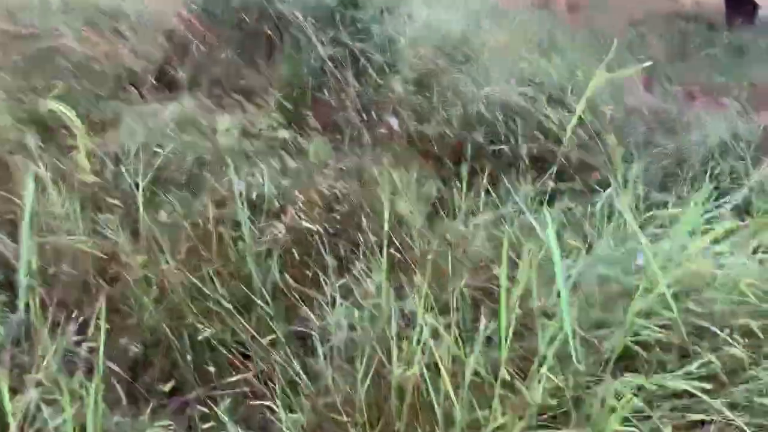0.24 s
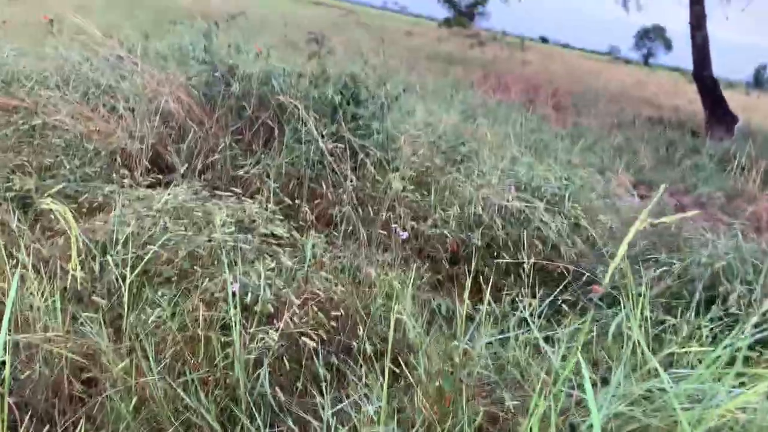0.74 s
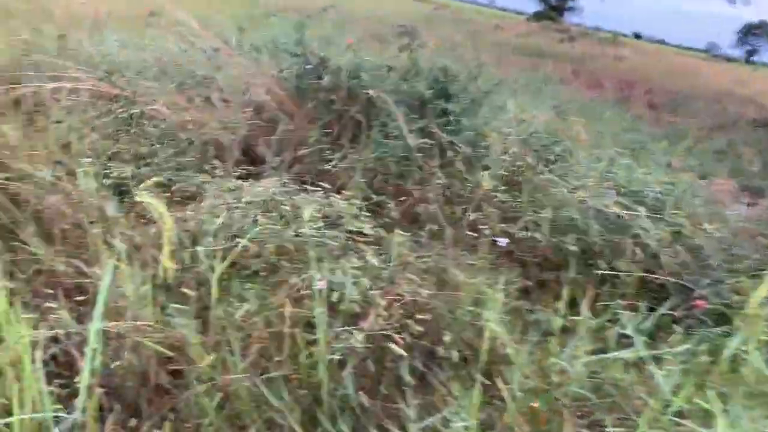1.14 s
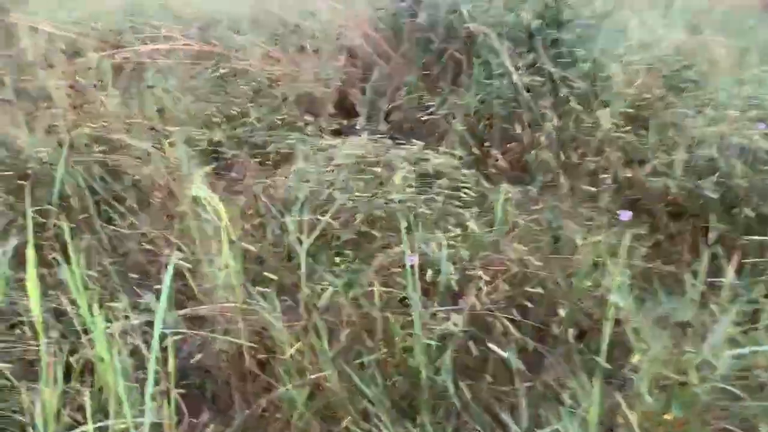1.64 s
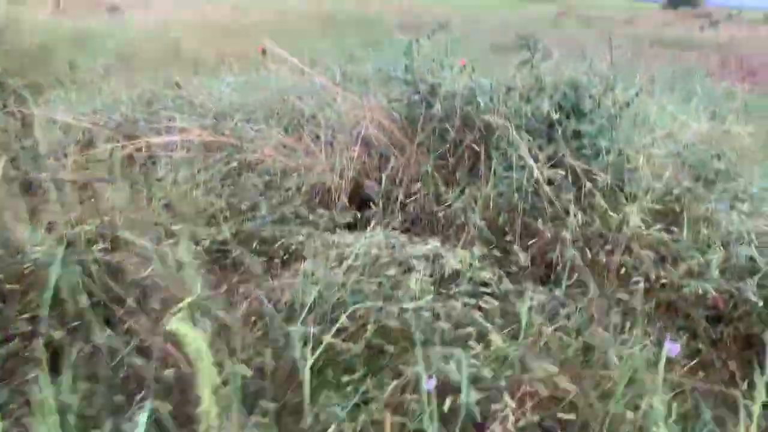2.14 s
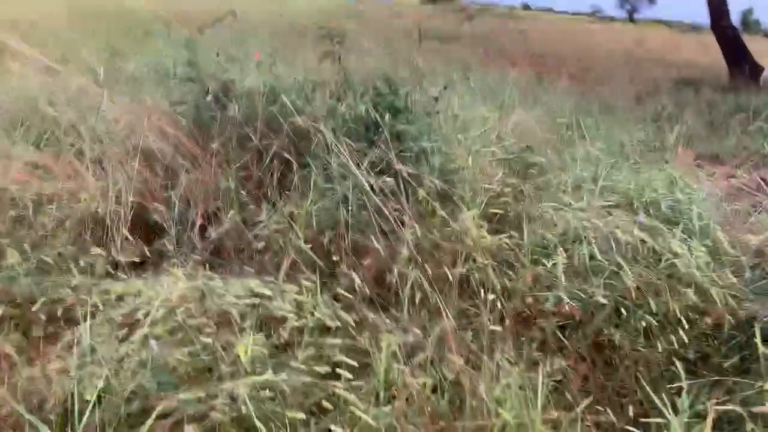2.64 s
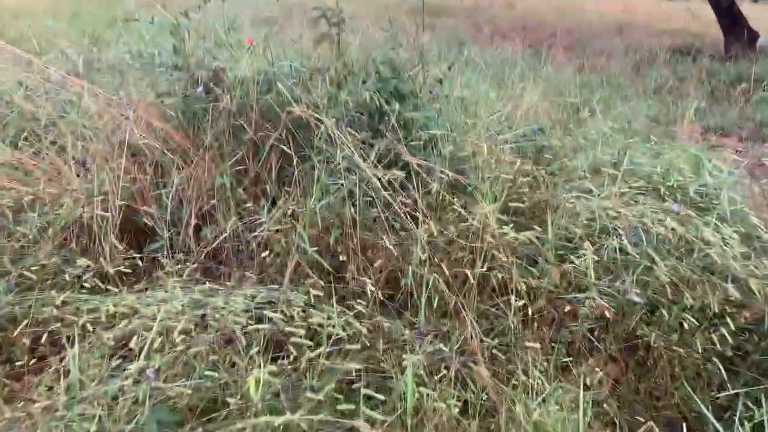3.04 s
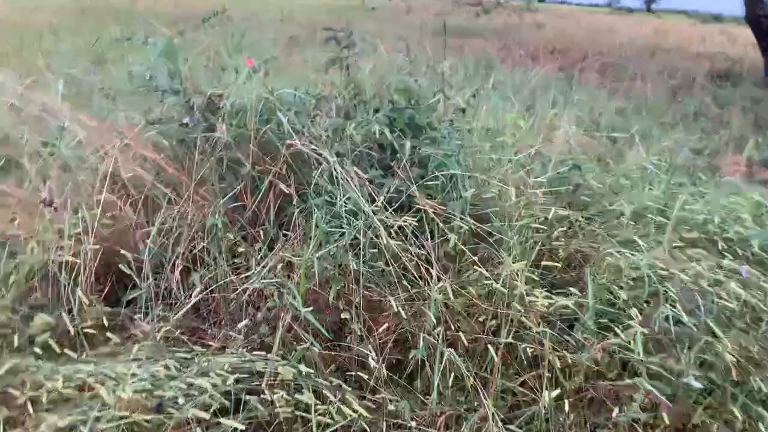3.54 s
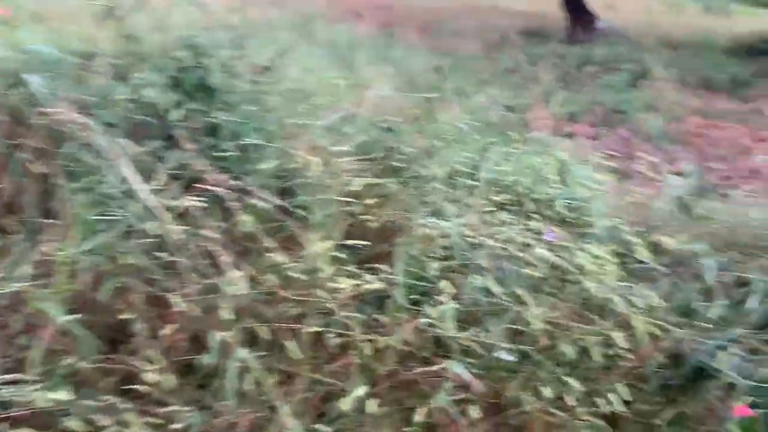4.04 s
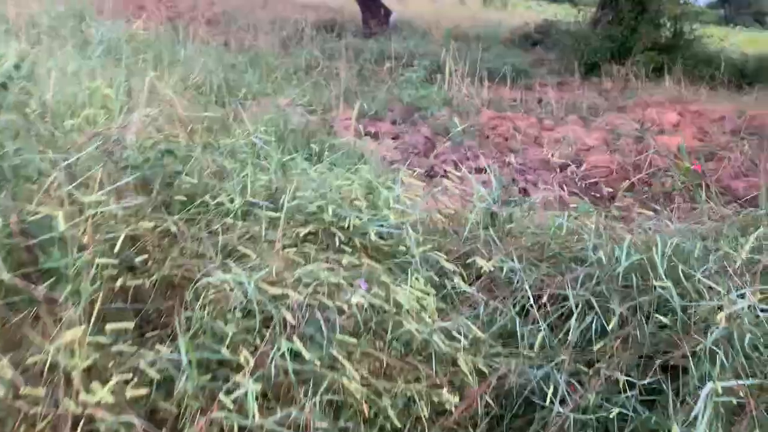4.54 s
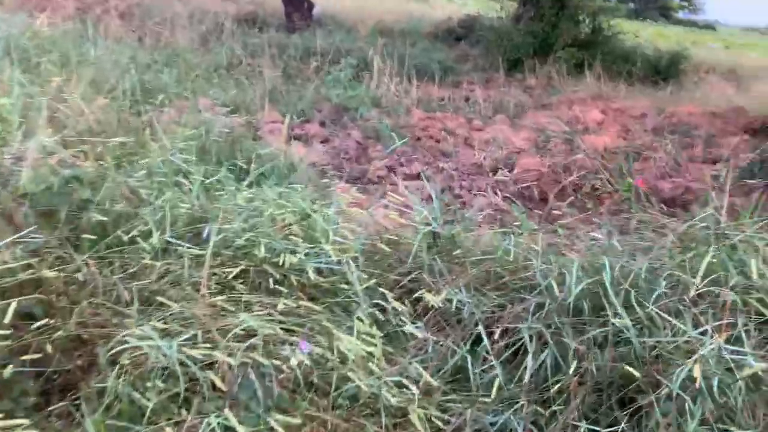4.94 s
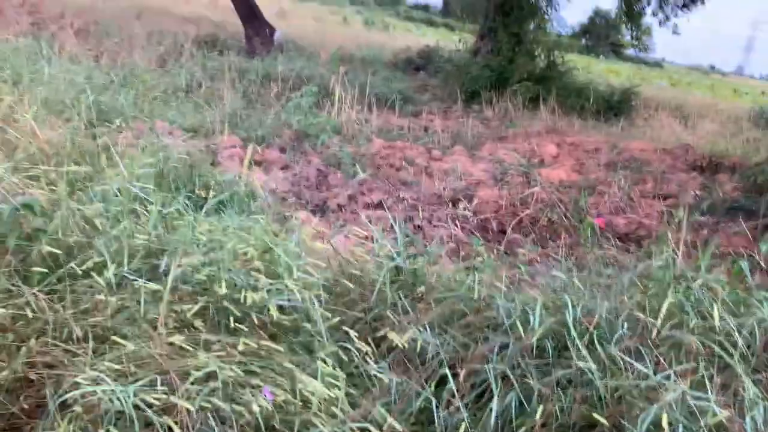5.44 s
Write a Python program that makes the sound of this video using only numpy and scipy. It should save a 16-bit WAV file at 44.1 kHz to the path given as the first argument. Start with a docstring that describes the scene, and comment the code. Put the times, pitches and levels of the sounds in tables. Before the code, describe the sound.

Someone wades slowly through tall dry grass, stems rustling and snapping, with small handling knocks, high insects and light wind on the microphone.

```python
"""Dry tall grass rustles as someone wades slowly through it with a hand-held camera.
Stick-slip friction sounds the stalks, blades and seed heads; stems snap by brittle fracture, and two
tufts slap the camera close to its two microphone ports. Slipping fingers excite the modes of the case,
which knocks and creaks. Insects stridulate at a high pitch, one of them near on the right, and the
turbulence of a light wind rumbles at the ports over the far hiss of the field."""
import sys
import numpy as np
from scipy import signal
from scipy.fft import rfft, irfft
from scipy.io import wavfile
from scipy.ndimage import uniform_filter1d

SR = 44100
rng = np.random.default_rng(int(sys.argv[2]) if len(sys.argv) > 2 else 0)


def inscribe(sig):
    """Save sig as 16-bit PCM at rate SR to the path in sys.argv[1].

    A 1-D sig is mono; a 2-D sig holds one channel per row.
    Samples are clipped to [-1, 1] before scaling.
    """
    pcm = np.round(np.clip(np.atleast_2d(sig).T, -1, 1) * 32767)
    wavfile.write(sys.argv[1], SR, pcm.astype(np.int16))


N = 250488
TIME = np.arange(N) / SR

# Pushes of a leg through the grass. Each row: time of reaching full speed, rise, hold and release in
# seconds, then the levels of bent stalks, sliding blades and seed heads in dB.
LEG_PUSHES = [(0.25, 1, 0.022, 0.59, -72.5, -81, -75), (0.91, 0.22, 0.35, 0.18, -65.5, -64.5, -59.5),
              (0.997, 0.1, 0.031, 0.21, -61, -57, -64), (1.238, 0.3, 0.014, 1, -83, -80, -76),
              (1.503, 0.6, 0.11, 0.086, -61.5, -77, -64.5), (2.053, 0.91, 0.035, 0.15, -62, -75, -73.5),
              (2.117, 0.022, 0.043, 0.3, -85, -61.5, -59.5), (2.438, 0.19, 0.051, 0.15, -52.5, -64, -69.5),
              (2.524, 1, 0.26, 0.79, -69.5, -80, -71), (2.804, 0.065, 0.062, 0.084, -79, -66.5, -68),
              (3.065, 0.39, 0.26, 0.16, -60, -66.5, -63), (3.457, 0.13, 0.11, 0.18, -66.5, -77, -70.5),
              (4.13, 0.46, 0.063, 0.5, -59.5, -67.5, -66), (4.595, 0.22, 0.023, 0.21, -70.5, -77, -77),
              (4.96, 0.3, 0.017, 0.46, -73, -78.5, -89)]
# Dry stems breaking. Each row: start in seconds, base level in dB, offset of the splinters in dB,
# pitch of the stem in Hz, tearing time in seconds.
STEM_SNAPS = [(0.2472, -43.5, -32, 2000, 0.012), (1.349, -35.5, -10.5, 1440, 0.0027),
              (1.4938, -41.5, -7, 1700, 0.012), (1.5014, -37.5, -18, 1900, 0.014),
              (2.437, -24.5, -36, 1300, 0.0046), (2.7915, -27, -8, 1200, 0.0045),
              (2.7965, -28, 1, 1380, .009), (2.8106, -31, 0, 1400, 0.0038), (2.82, -39, -4, 1300, .007),
              (3.1094, -42, -22, 1590, 0.011), (3.2486, -32, -18, 1800, .011),
              (3.3002, -29.5, -26, 1600, 0.012), (3.3108, -34, -18, 1300, 0.01),
              (3.3654, -36, -22, 1550, .011), (3.47, -40.5, -24, 1480, 0.0086),
              (3.476, -44.5, -20, 1500, 0.014), (3.5639, -48.5, 6, 1500, 0.0088),
              (3.999, -42.5, -18, 1630, 0.0052), (4.01, -48, -24, 2320, 0.016),
              (4.3012, -41, -14, 1900, 0.016), (4.3227, -37, -22, 1750, 0.008),
              (4.6295, -43.5, -20, 1500, .018), (4.6814, -48, -28, 1850, .012),
              (5.0894, -52, -19, 1680, 0.0051)]
# Seed heads flicking past. Each row: start in seconds, level in dB.
SEED_FLICKS = [(0.529, -65.5), (0.6338, -47), (0.644, -72), (1.231, -51), (4.607, -61.5)]
# Tufts striking the case. Each row: start in seconds; crunch, blade, seed and scrape levels in dB; thud
# delay in seconds, level in dB and pitch in Hz; drag level in dB, centre in Hz and time in seconds.
TUFT_SLAPS = [(1.492, -31.5, -82, -48, -40, 0.0133, -22.5, 90, -45, 870, 0.13),
              (2.1208, -30.5, -45, -44.5, -49, 0.011, -20.5, 100, -44.5, 975, 0.1)]
# Likeness of the rustle at the two ports. Each row: frequency in Hz, correlation coefficient.
GRASS_CORRELATION = [(200, 1), (570, 0.72), (1200, 0.9), (2200, 0.73), (4000, 0.97), (5500, 0.12),
                     (11000, 0.063)]

# Spectra of the plants. Each row: frequency in Hz, relative spectral density in dB.
STALKS = [(150, 2), (350, 10), (580, 11.5), (850, 7.5), (1150, 3.5), (1550, 7), (2100, 1.5), (2600, 2),
          (3200, -12), (5000, -8), (11000, -42)]
BLADES = [(1100, -31), (1600, 5.5), (2100, -2.5), (2600, 4), (3600, 9.5), (4200, 9.5), (5000, 1.5),
          (6500, -17), (9000, -11), (12000, -17)]
SEEDS = [(4000, -44), (5800, -1), (7100, -5), (7800, 0.5), (8700, 4.5), (11200, 1.5), (12000, -90)]
SNAP = [(300, -11), (750, 14), (1400, 23.5), (2300, 6.5), (3400, 8.5), (5200, -15), (9000, 0)]  # a stem pitched at SNAP_HZ
SPLINTER = [(2500, -8), (4500, 6.5), (7000, 13), (9500, 12), (11000, 4), (12500, -68)]
CRUNCH = [(60, 18.5), (250, 14), (520, 15), (800, -4), (1250, -9), (1900, -6), (2600, -16), (3500, -56),
          (8000, -43)]
BLADE_SLAP = [(1500, -36), (2600, -4), (3700, 10.5), (5000, 0.5), (6000, 2), (7500, -14)]
SEED_SLAP = [(4000, -2), (6000, 4), (7500, 3), (8500, 26), (9500, 10), (11000, 5), (12000, -44)]
SCRAPE = [(1300, -26), (2000, 13), (2600, 4), (3300, -7), (3900, 2), (4400, -8), (5500, -14), (7000, -30)]  # blade edges crossing the ports
DRAG = [(250, -27), (500, 7.5), (750, -5), (1000, 4.5), (1180, -1), (1450, -31), (2500, -31)]  # a tuft dragging along the case, centred on DRAG_HZ

# Shifts of the grip. Each row: start in seconds, levels of the wall, low and high modes in dB.
GRIP_KNOCKS = [(0.019, -39, -37, -44), (0.21, -36.5, -43, -53), (0.594, -36.5, -41.5, -53),
               (1.046, -27, -40, -43), (1.491, -31.5, -35.5, -47), (1.518, -39, -40, -50),
               (1.529, -37, -37, -59), (1.604, -40.5, -39, -38.5), (1.8, -30, -43.5, -46.5),
               (1.992, -41.5, -52, -50.5), (2.124, -34, -37, -54), (2.49, -54, -37, -62),
               (2.669, -44.5, -45.5, -56), (2.725, -46, -41, -60), (3.149, -40.5, -62, -52),
               (3.383, -47.5, -49, -49.5), (3.472, -46, -34.5, -39.5), (3.542, -44.5, -47, -44),
               (3.803, -33.5, -49, -55), (3.905, -38, -51, -51.5), (4.093, -31, -41, -44),
               (4.453, -34.5, -37.5, -42.5), (4.459, -46, -34, -39)]
# Slides of the grip. Each row: start and length in seconds, level in dB, low modes against wall modes
# in dB, lowest mode in Hz (higher in a tight grip).
GRIP_CREAKS = [(0.211, 0.056, -38.5, 1.5, 269.5), (1.09, .14, -63.5, -17, 251),
               (3.154, 0.055, -47.5, 3, 345), (3.405, 0.085, -53, 0, 252), (3.479, 0.022, -48.5, 3, 260),
               (3.811, 0.074, -49, -3.5, 249), (4.12, 0.097, -58, -10, 250)]
# Modes of the case. Each row: mean frequency in Hz, relative level in dB, time to fall 60 dB in seconds.
LOW_MODES = [(249.8, 2.5, 0.06), (290, -0.5, 0.059), (335.3, -4, 0.044), (400.5, 1.5, 0.018)]  # the case as a whole
WALL_MODES = [(513.2, 1.5, 0.075), (620, -6, 0.094), (801, -10.5, 0.021), (1470, -28, 0.13),
              (1563, -42, 0.031)]
HIGH_MODES = [(826, -2.5, 0.068), (897, 3, 0.048), (1022, -7, 0.023)]  # excited by a sharp press

# Swell of the near insect and the chorus. Each row: time in seconds, gain in dB.
INSECT_SWELL = [(0, 1), (0.2, 3.5), (0.37, 8), (0.58, 1.5), (1.2, 5.5), (1.8, 3.5), (2.9, 5.5), (3.7, 4),
                (4.05, 2.5), (5.6, 0)]
# Swells of low rumble at the ports; the row at 1.525 s deepens the low boom of the first slap. Each row: time
# of the peak and half width in seconds, rise above the breeze in dB.
GUSTS = [(0.331, 0.01, 8), (0.467, 0.018, 9), (1.525, 0.037, 2.5), (1.8, 0.042, 6), (2.92, 0.16, 1.5),
         (5.02, 0.02, 3.5)]
# Spectra of the background. Each row: frequency in Hz, relative spectral density in dB.
CHORUS = [(5400, -36), (6100, -5.5), (6600, -2), (6950, 8), (7350, 6), (7600, -6.5), (7800, -19),
          (8600, -41), (11000, -34)]  # far insects
SHRILL = [(7500, -40.5), (8100, 19), (8500, 13.5), (9200, 11.5), (9900, 0), (11200, -22), (12000, -42)]  # a bright hiss at 8-9.5 kHz, stronger on the right
WIND_RUMBLE = [(20, -18.5), (35, -12.5), (52, 2), (80, 0.5), (120, -4), (170, -12), (240, -13), (320, -22),
               (450, -55), (800, -112)]
FIELD_HISS = [(100, -49), (350, 5), (600, 7), (850, -4.5), (1200, -11), (2000, -15.5), (2900, -21.5),
              (3500, -22.5), (4300, -29), (5200, -29), (11300, -22), (12200, -65)]

SNAP_HZ, DRAG_HZ = 1400, 1000
PORT_DELAY_S = 0.000476  # travel time of sound from one port to the other


def grass_rustle():
    """Stick-slip friction: stalks, blades and seed heads catch and let go in clumps of fine clicks."""
    stalk_rub = rubbing(part=0, rest_db=-117)
    blade_rub = rubbing(part=1, rest_db=-102)
    seed_rub = rubbing(part=2, rest_db=-89, linger=1.72)  # seed heads sway on
    clumps = amp(1.5 * drift(rate_hz=45))
    stalks = colour(grains(N, per_s=900, spread_db=-2.5, smooth=0.7), STALKS, GRASS_CORRELATION)
    blades = colour(grains(N, per_s=2300, spread_db=2, smooth=1), BLADES, GRASS_CORRELATION)
    seeds = colour(grains(N, per_s=5900, spread_db=6.5, smooth=1), SEEDS, GRASS_CORRELATION)
    stalks = patchy(stalks, depth_db=2.8) * stalk_rub * clumps
    blades = patchy(blades, depth_db=2.1) * blade_rub * clumps
    seeds = patchy(seeds, depth_db=1.4) * seed_rub * amp(0.5 * drift(rate_hz=12))
    ticks = blade_crackle(per_s=220, pitches=16) * np.sqrt(stalk_rub * blade_rub) * amp(-7.5)
    return stalks + blades + ticks + seeds * pan(left_db=-2)


def rubbing(part, rest_db, linger=1):
    """Incoherent sources add in power: the leg pushes sum to the envelope of one part of the plants."""
    power = amp(rest_db) ** 2
    range_db = 30  # gained over a rise, lost over a release
    for start, rise, hold, release, *levels_db in LEG_PUSHES:
        before = np.maximum(start - TIME, 0) / rise
        after = np.maximum(TIME - start - hold, 0) / (release * linger)
        power = power + amp(levels_db[part] - range_db * (before + after)) ** 2
    return np.sqrt(power)


def grains(size, per_s, spread_db, smooth):
    """Shot noise: fibres click at random with uneven strength, over a share of smooth friction noise."""
    strength = amp(spread_db * np.minimum(rng.exponential(1, (2, size)), 4))
    clicks = strength * rng.choice([-1, 1], (2, size)) * (rng.random((2, size)) < per_s / SR)
    return unit_rms(clicks) + smooth * rng.standard_normal((2, size))


def patchy(pair, depth_db):
    """Spectral modulation: each stem has its own pitch, so the colour shifts in small patches."""
    spectrogram = signal.stft(pair, nperseg=512)[2]
    patches = uniform_filter1d(rng.standard_normal(spectrogram.shape[1:]), size=5, axis=0)
    patches = unit_rms(uniform_filter1d(patches, size=7, axis=1))
    shifted = signal.istft(spectrogram * amp(depth_db * patches), nperseg=512)[1]
    return unit_rms(shifted[:, :pair.shape[1]])


def blade_crackle(per_s, pitches):
    """Damped free vibration: single blades let go at random, each ticking at its own pitch and side."""
    out, t = np.zeros((2, N)), np.arange(512) / SR
    tick_cycles = 2.5
    for hz in np.geomspace(1290, 4560, pitches):  # thickest blade to thinnest
        released = rng.random(N) < per_s / pitches / SR
        side = rng.standard_normal()
        strength = amp(2 * np.minimum(rng.exponential(1, N), 2))
        age = t * hz / tick_cycles
        tick = np.sin(2 * np.pi * hz * t) * age * np.exp(-np.pi * age)
        out += signal.oaconvolve(released * strength, tick)[:N] * pan(left_db=2 * side)
    return unit_rms(out)


def stem_snaps():
    """Brittle fracture: a stem clicks at its own pitch, then its fibres tear, fray and splinter."""
    out, t = np.zeros((2, N)), np.arange(2048) / SR
    lead_in = 128  # samples of room for the click's onset
    click_db, tear_db, fray_db, splinter_db = -4, -13.5, -19, -10
    impulse = np.ones((2, 1)) * (np.arange(len(t)) == lead_in)
    for start, db, treble_db, stem_hz, tearing_s in STEM_SNAPS:
        stem = [(hz * stem_hz / SNAP_HZ, level) for hz, level in SNAP]
        click = colour(impulse, stem)
        click /= abs(click).max()
        tearing = np.exp(-(np.pi * t / tearing_s) ** 2) + amp(fray_db) * decay(t, t60=0.1)
        fibres = np.roll(tearing * rng.standard_normal((2, len(t))), lead_in, axis=1)
        tear = colour(fibres, stem, correlation=0.52) * np.sqrt(np.mean(tearing ** 2))
        add(out, start - lead_in / SR, amp(db + click_db) * click + amp(db + tear_db) * tear)
        splinters = noise(len(t), SPLINTER, correlation=0.19)
        fall = decay(t, t60=0.0059) + amp(-18.5) * decay(t, t60=0.14)
        add(out, start, amp(db + treble_db + splinter_db) * fall * splinters)
    return out


def seed_flicks():
    """Light impact: a seed head flicking past gives a short burst of treble noise."""
    out, t = np.zeros((2, N)), np.arange(2048) / SR
    envelope = (1 - np.exp(-t / 0.002)) * decay(t, t60=0.1)
    for start, db in SEED_FLICKS:
        add(out, start, amp(db) * envelope * noise(len(t), SPLINTER, correlation=0.41))
    return out


def tuft_slaps():
    """Soft impact: a tuft crunches on the case and scrapes the ports, lands with a thud, then drags."""
    out, t = np.zeros((2, N)), np.arange(8192) / SR
    attack = 1 - np.exp(-t / 0.0041)
    short = attack * decay(t, t60=0.14)
    lingering = short + attack * amp(-15.5) * decay(t, t60=0.59)
    thud_envelope = (1 - np.exp(-t / 0.003)) * decay(t, t60=0.071)
    for start, crunch_db, blade_db, seed_db, scrape_db, delay, thud_db, thud_hz, *drag in TUFT_SLAPS:
        parts = [(crunch_db, CRUNCH, short, -0.09, -3), (blade_db, BLADE_SLAP, lingering, 0.6, 0),
                 (seed_db, SEED_SLAP, lingering, -0.09, -8), (scrape_db, SCRAPE, lingering, -0.93, -1)]
        for db, spectrum, envelope, correlation, left_db in parts:
            burst = colour(grains(len(t), per_s=2300, spread_db=3.5, smooth=0.76), spectrum, correlation)
            add(out, start, amp(db) * envelope * burst * pan(left_db))
        thud = np.sin(2 * np.pi * thud_hz * t + np.array([[0], [0.9]])) * thud_envelope
        add(out, start + delay, amp(thud_db) * thud * pan(left_db=-4.5))
        out += tuft_drag(start, *drag)
    return out


def tuft_drag(slap_s, db, centre_hz, length_s):
    """Sliding friction: a tuft meets the case just before its slap and eases until it slips off."""
    rise_s, release_s, sag_db = 0.03, 0.07, -10
    band = [(hz * centre_hz / DRAG_HZ, level) for hz, level in DRAG]
    corners_s = [-rise_s, 0, length_s, length_s + release_s]
    contact = np.interp(TIME - slap_s, corners_s, [0, 1, amp(sag_db / 2), 0]) ** 2
    friction = grains(N, per_s=350, spread_db=2, smooth=0.39)
    return amp(db) * contact * colour(friction, band, correlation=-0.81)


def case_knocks():
    """Impulse excitation: one slip of the fingers rings the wall, low and high modes of the case."""
    out = np.zeros((2, N))
    for start, wall_db, low_db, high_db in GRIP_KNOCKS:
        add(out, start, amp(wall_db) * case_ring(WALL_MODES, lead_rad=1.67))
        add(out, start, amp(low_db) * case_ring(LOW_MODES, lead_rad=0.79))
        add(out, start, amp(high_db) * case_ring(HIGH_MODES, lead_rad=2.18))
    return out


def case_creaks():
    """Stick-slip excitation: a sliding grip drives the modes of the case with a run of uneven slips."""
    out = np.zeros((2, N))
    for start, length, db, low_db, low_hz in GRIP_CREAKS:
        low_modes = [(hz * low_hz / LOW_MODES[0][0], level, t60) for hz, level, t60 in LOW_MODES]
        size = round(length * SR)
        slips = 0.087 * rng.standard_normal((1, size))  # skin rubs between the slips
        slip_samples = SR * np.cumsum(np.r_[0, rng.uniform(0.005, 0.014, 30)])
        slips[0, slip_samples[slip_samples < size].astype(int)] = 1
        ring = case_ring(WALL_MODES, lead_rad=1.12)
        ring += amp(low_db) * case_ring(low_modes, lead_rad=0.58)
        ring += amp(-16) * case_ring(HIGH_MODES, lead_rad=1.8)
        creak = signal.fftconvolve(slips, ring, axes=1)
        add(out, start, amp(db) * creak / creak[:, :size].std())
    return out


def case_ring(modes, lead_rad):
    """Modal superposition: a soft fingertip starts damped sinusoids; the right port leads in phase."""
    t = np.arange(4096) / SR
    ring = np.zeros(len(t), complex)
    for mean_hz, db, t60 in modes:
        hz = mean_hz * (1 + 0.014 * rng.standard_normal())
        ring += amp(db) * decay(t, t60) * np.exp(2j * np.pi * hz * t)
    at_ports = (ring * np.exp(1j * np.array([[0], [lead_rad]]))).imag
    soft_onset = 1 - np.exp(-(t / 0.0017) ** 2)
    return at_ports * soft_onset * pan(left_db=1.5)


def near_insect():
    """Stridulation: an insect on the right draws scraper over file in bursts of two to four strokes."""
    out, t = np.zeros((2, N)), np.arange(round(0.01004 * SR)) / SR
    progress, start = t / t[-1], 0.
    envelope = np.sin(np.pi * progress ** 1.04).clip(0) ** 2.35
    while start < TIME[-1]:
        for _ in range(rng.choice([2, 3, 3, 4])):
            strength, pitch, pace = rng.standard_normal(3)
            hz = (5850 + 1150 * progress) * (1 + 0.008 * pitch)  # the scraper speeds up along the file
            stroke = envelope * np.sin(2 * np.pi * np.cumsum(hz) / SR)
            add(out, start, amp(2 * strength) * stroke * pan(left_db=-7))
            start += 0.0137 * (1 + 0.03 * pace)
        start += rng.uniform(0.006, 0.014)
    out[0] = np.roll(out[0], round(PORT_DELAY_S * SR))  # the left port hears it later
    return out


def insects():
    """Incoherent summation: behind the near insect, many far calls blur into a band of noise; a bright hiss
    rides above them, stronger on the right."""
    near = amp(-66.5) * near_insect()
    chorus = from_the_sides(noise(N, CHORUS), spill=0.13)
    chorus *= amp(-67.5 + 1.45 * drift(rate_hz=24) + 1.77 * drift(rate_hz=7.1))
    shrill = noise(N, SHRILL) * amp(-82.5 + drift(rate_hz=84))
    swell = amp(np.interp(TIME, *np.transpose(INSECT_SWELL)))
    return swell * (near + chorus * pan(left_db=-2.5)) + shrill * pan(left_db=-15.5)


def wind():
    """Turbulent pressure: eddies of a steady breeze and a few gusts buffet both ports almost alike."""
    breeze_db = -47 + 0.8 * drift(rate_hz=38)
    gusts_db = sum(db * np.exp(-((TIME - peak) / width) ** 2) for peak, width, db in GUSTS)
    return noise(N, WIND_RUMBLE, correlation=0.98) * amp(breeze_db + gusts_db)


def field_hiss():
    """Diffuse sound: the far hiss of the field arrives from both sides and wavers slowly."""
    hiss = patchy(noise(N, FIELD_HISS), depth_db=2.2)
    return from_the_sides(hiss, spill=0.45) * amp(-67 + 1.5 * drift(rate_hz=2))


def from_the_sides(pair, spill):
    """Path difference: far sound from either side also reaches the other port, a little later."""
    return unit_rms(pair + spill * np.roll(pair[::-1], round(PORT_DELAY_S * SR), axis=1))


def colour(pair, spectrum, correlation=0.):
    """Filtering and cross-mixing give two signals a spectrum and a left-right correlation; rms 1."""
    size = pair.shape[1]
    hz = np.fft.rfftfreq(size, 1 / SR)
    if np.ndim(correlation):
        correlation = curve_at(correlation, hz)
    angle = np.arcsin(np.clip(correlation, -1, 1)) / 2
    shaped = rfft(pair) * amp(curve_at(spectrum, hz))
    return unit_rms(irfft(np.cos(angle) * shaped + np.sin(angle) * shaped[::-1], size))


def noise(size, spectrum, correlation=0.):
    """Filtered Gaussian noise in stereo; rms 1."""
    return colour(rng.standard_normal((2, size)), spectrum, correlation)


def drift(rate_hz):
    """Low-pass noise gives a random wander of rms 1."""
    rolloff = 1 + (np.fft.rfftfreq(N, 1 / SR) / rate_hz) ** 4
    return unit_rms(irfft(rfft(rng.standard_normal(N)) / rolloff, N))


def curve_at(points, hz):
    """Interpolation on a log-frequency axis."""
    point_hz, values = np.transpose(points)
    return np.interp(np.log(hz + 1), np.log(point_hz + 1), values)


def decay(t, t60):
    """Exponential damping by 60 dB in t60 seconds."""
    return amp(-60 * t / t60)


def amp(db):
    """Amplitude ratio of a level in decibels."""
    return 10 ** (np.asarray(db) / 20)


def unit_rms(x):
    """Normalisation to rms 1."""
    return x / np.sqrt(np.mean(x ** 2) + 1e-20)


def pan(left_db):
    """Channel gains for a level difference of left over right."""
    return amp([[left_db / 2], [-left_db / 2]])


def add(mix, start_s, sound):
    """Superposition of a stereo sound on the mix."""
    part = mix[:, max(round(start_s * SR), 0):][:, :sound.shape[1]]
    part += sound[:, :part.shape[1]]


def scene():
    """Free field: the sources add in the open, without echoes."""
    air = wind() + field_hiss()
    plants = grass_rustle() + stem_snaps() + seed_flicks() + tuft_slaps()
    return plants + case_knocks() + case_creaks() + insects() + air


def record(dry):
    """Band limiting: the recorder's low-pass filter removes the highest treble."""
    edge_hz = 11420
    lowpass = signal.firwin(511, edge_hz, window=("kaiser", 8), fs=SR)
    return signal.oaconvolve(dry, lowpass[None], "same")


dry = scene()
out = record(dry)
inscribe(out)
```